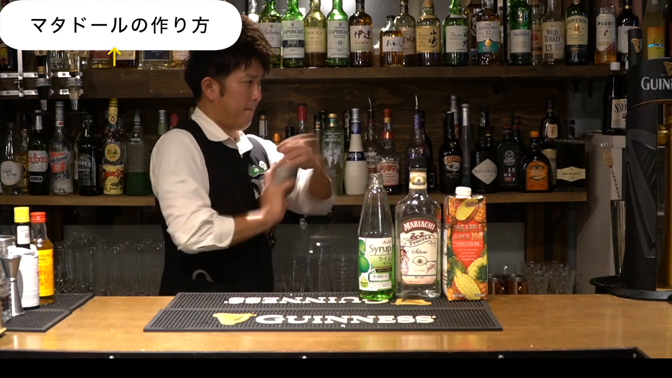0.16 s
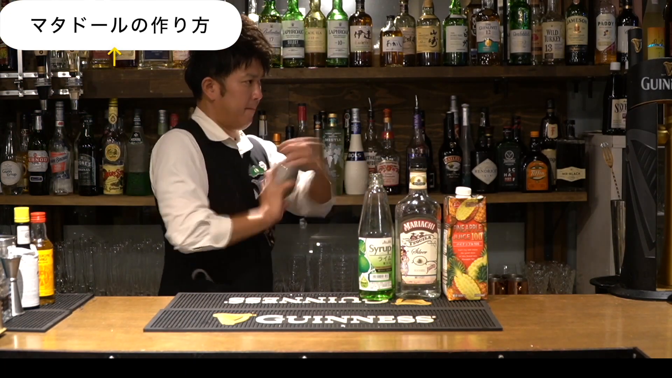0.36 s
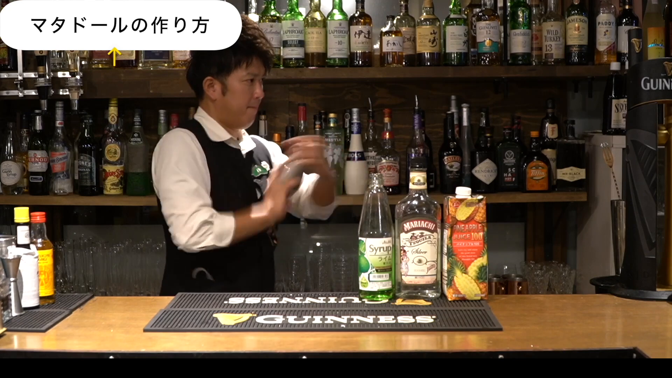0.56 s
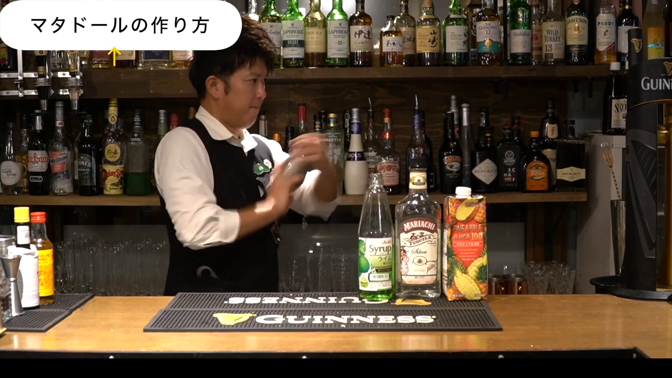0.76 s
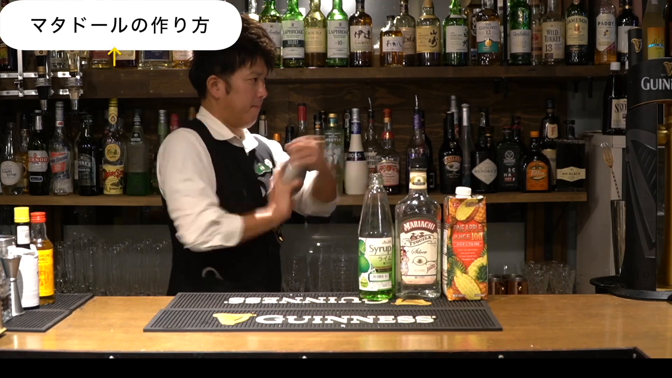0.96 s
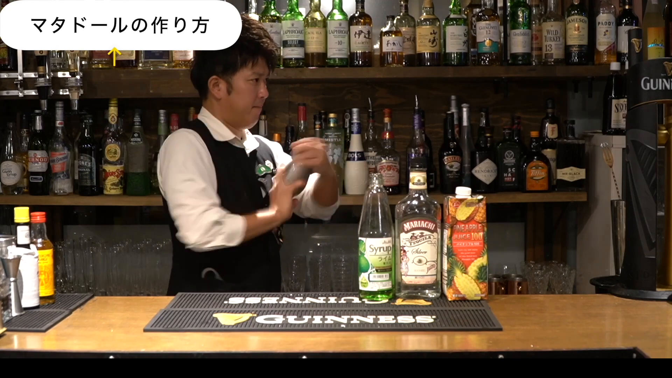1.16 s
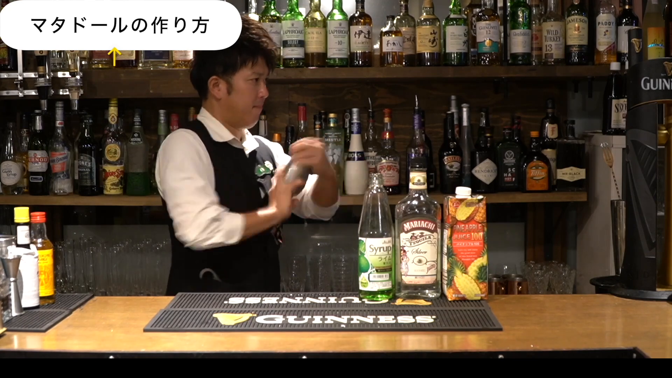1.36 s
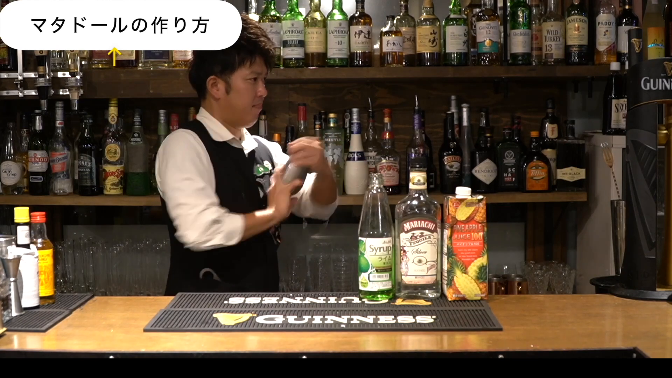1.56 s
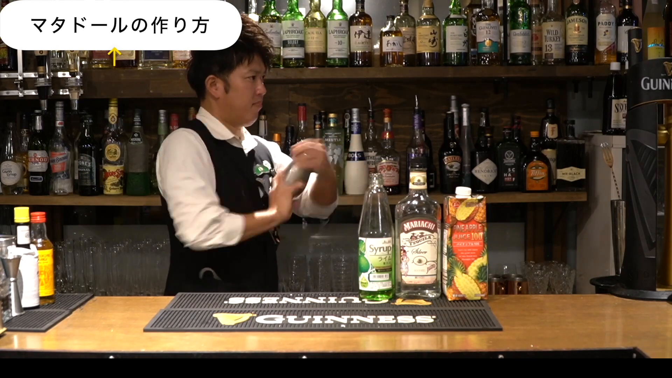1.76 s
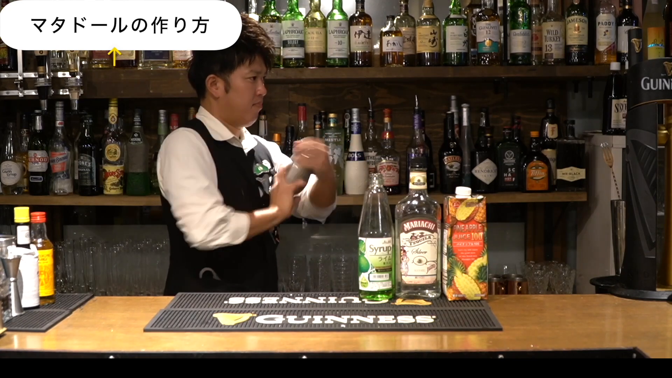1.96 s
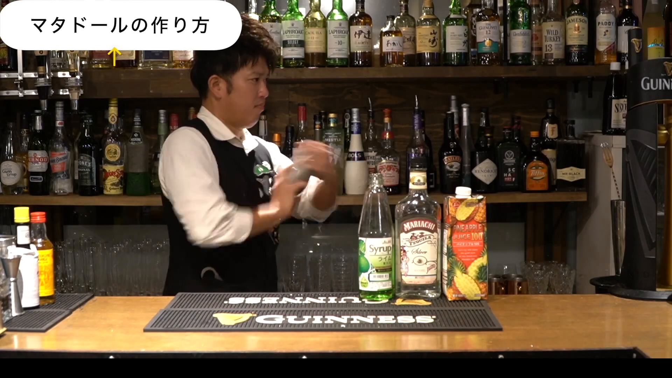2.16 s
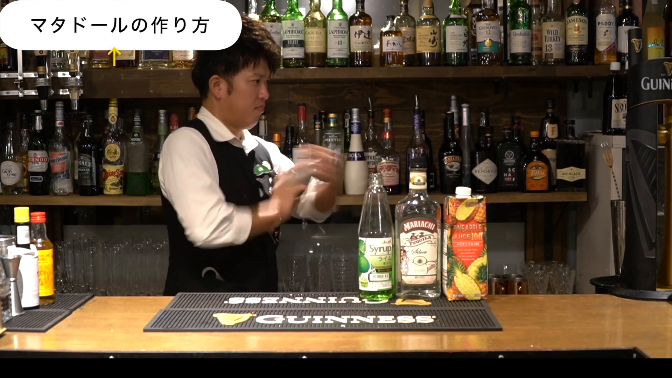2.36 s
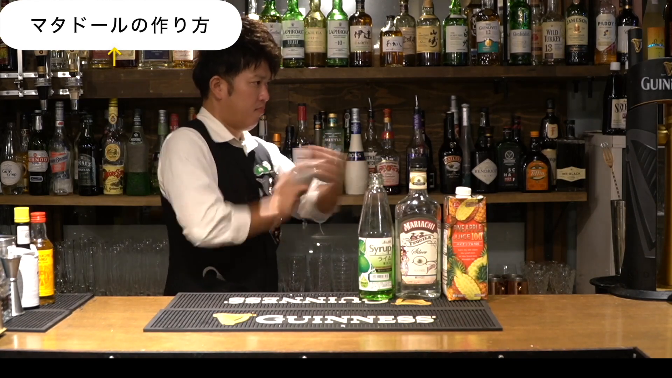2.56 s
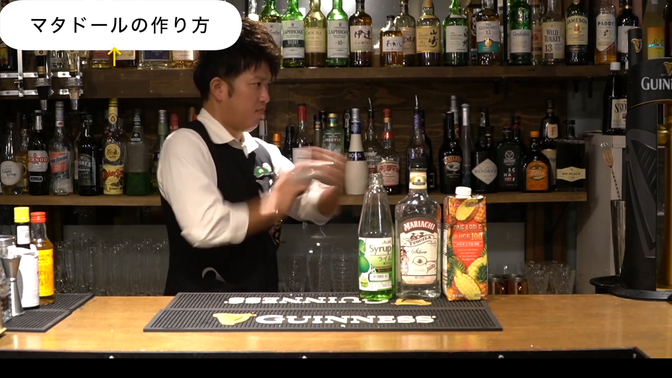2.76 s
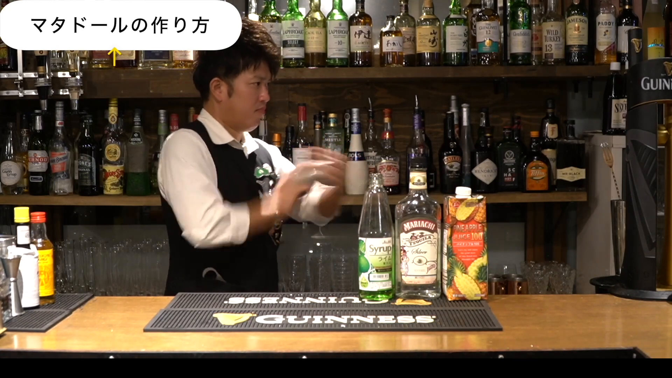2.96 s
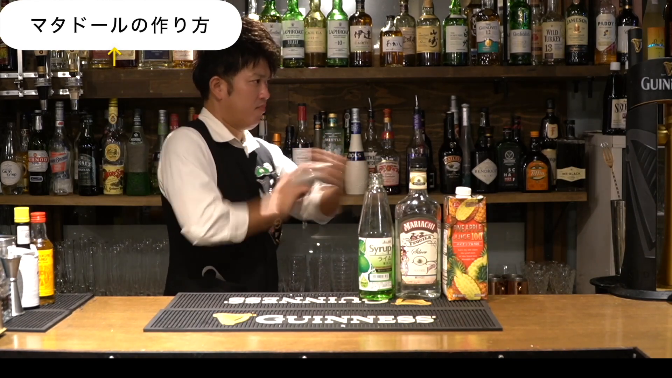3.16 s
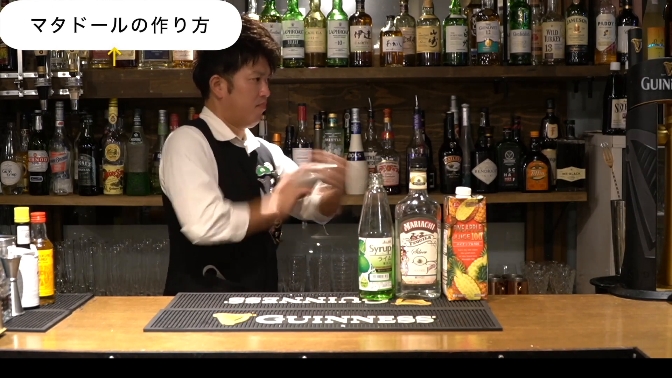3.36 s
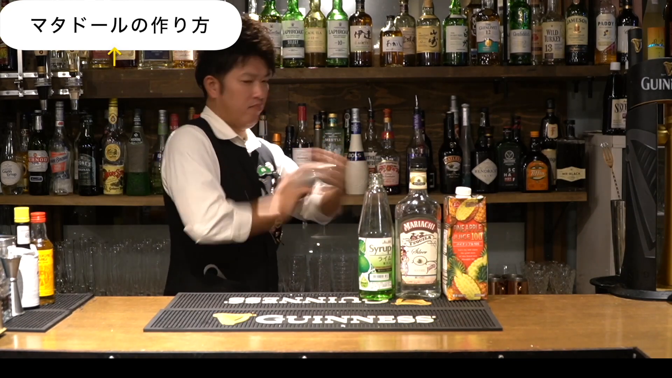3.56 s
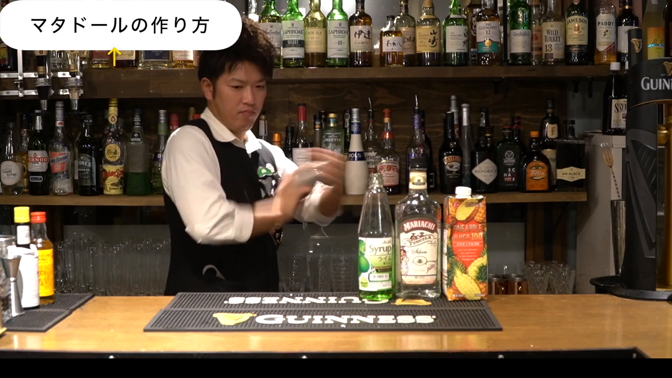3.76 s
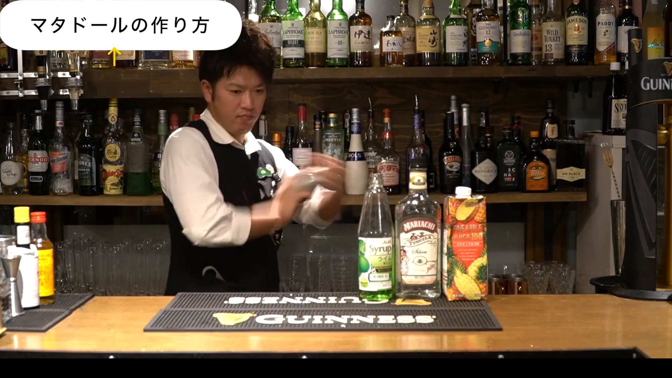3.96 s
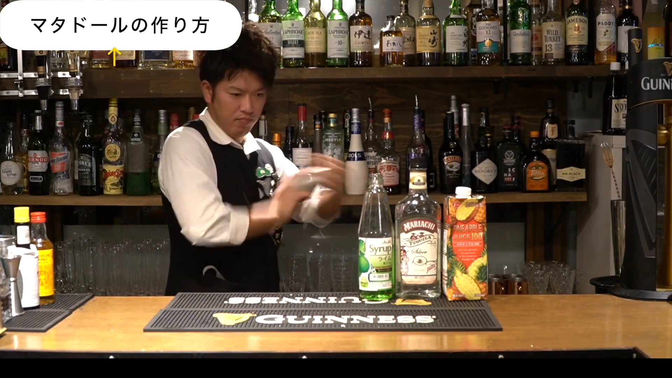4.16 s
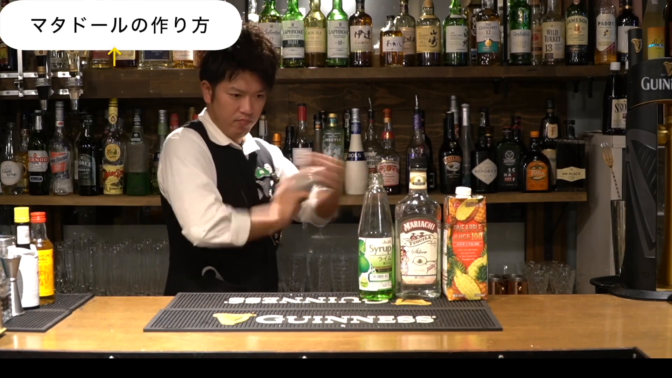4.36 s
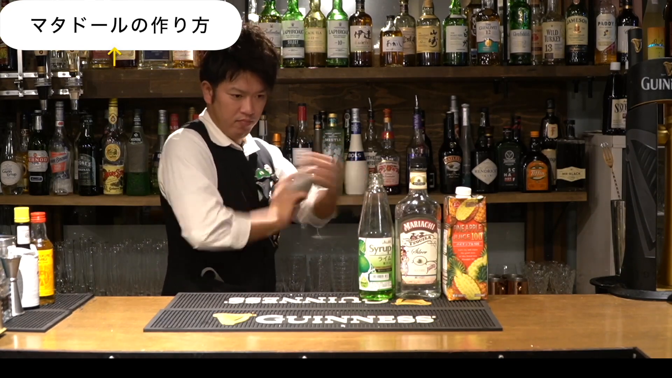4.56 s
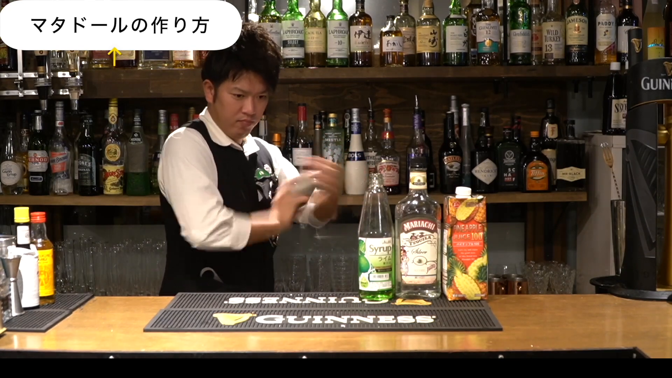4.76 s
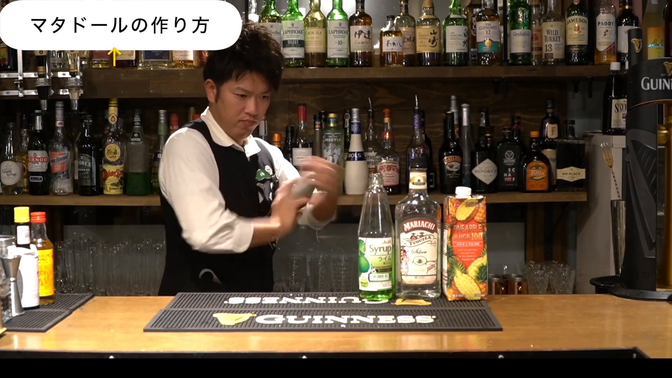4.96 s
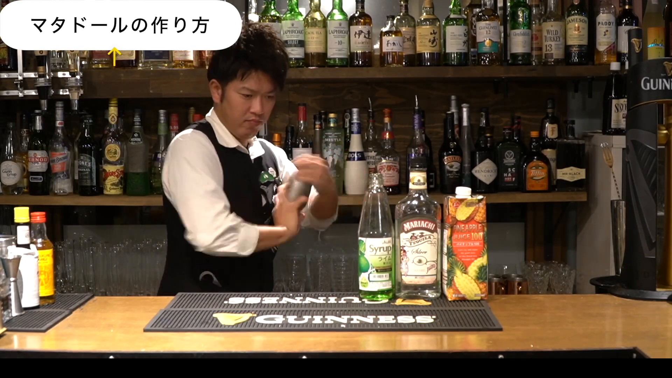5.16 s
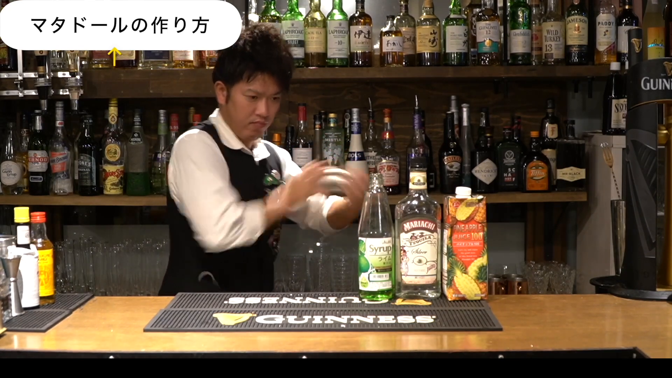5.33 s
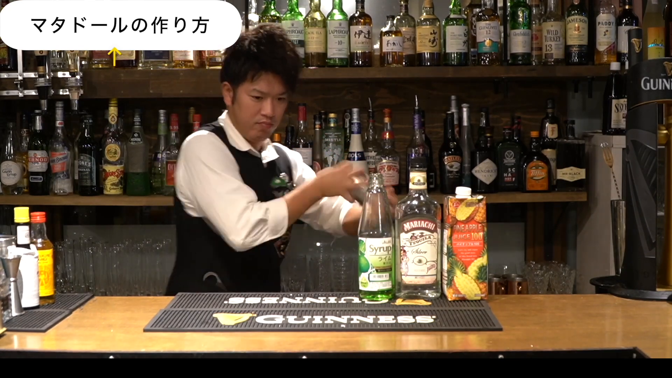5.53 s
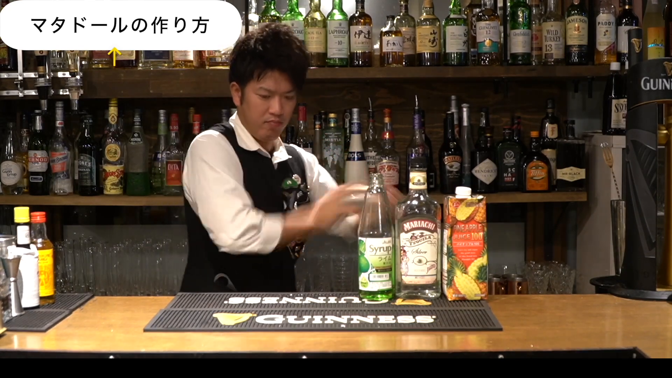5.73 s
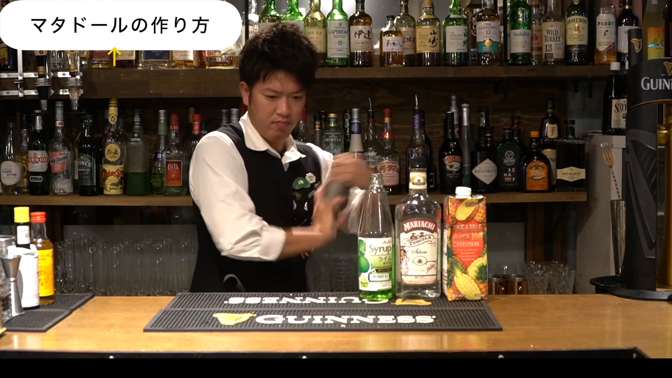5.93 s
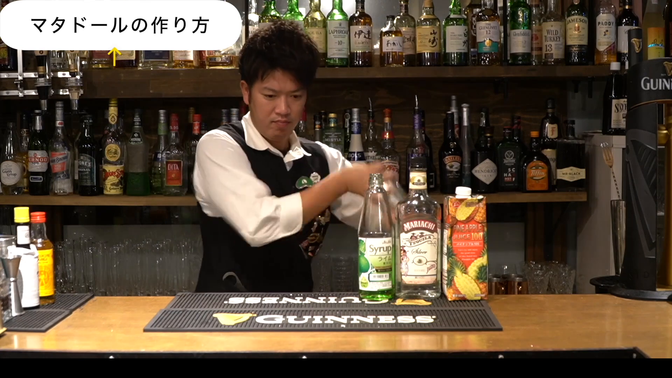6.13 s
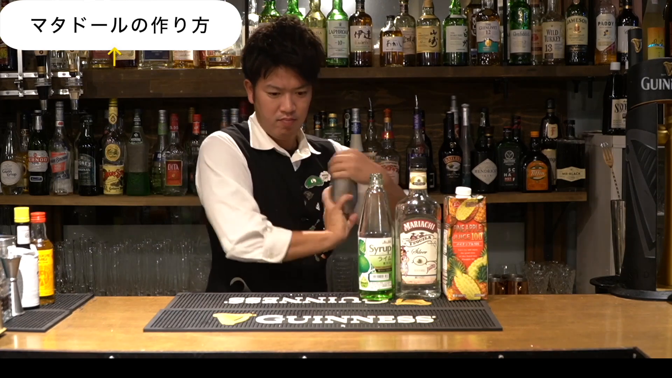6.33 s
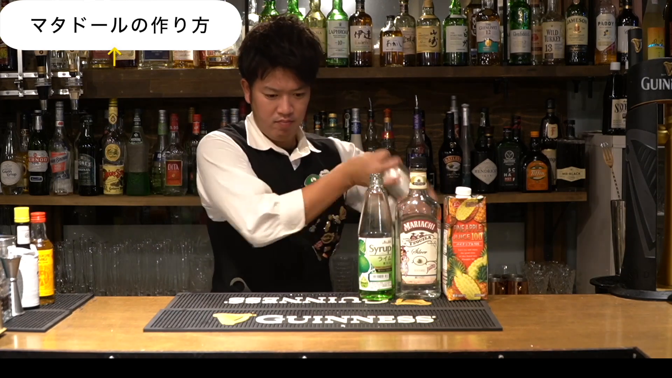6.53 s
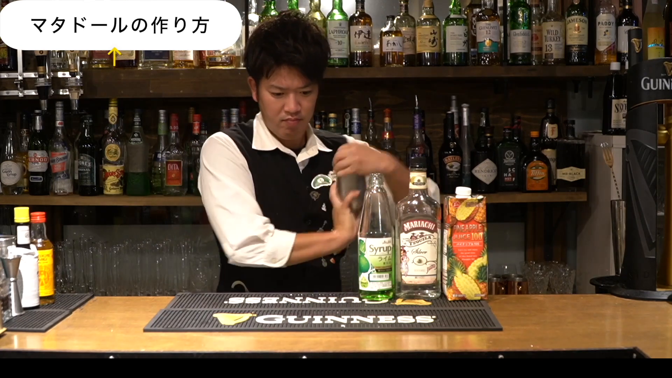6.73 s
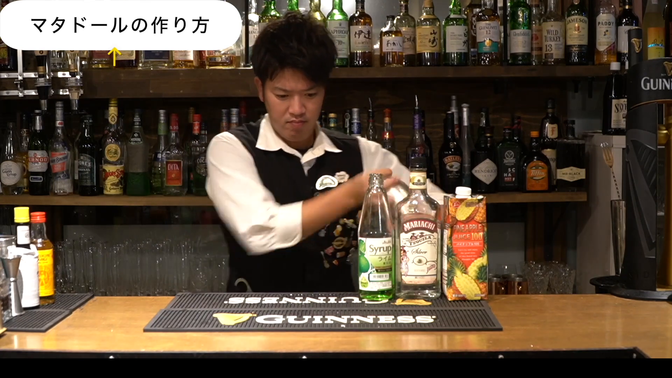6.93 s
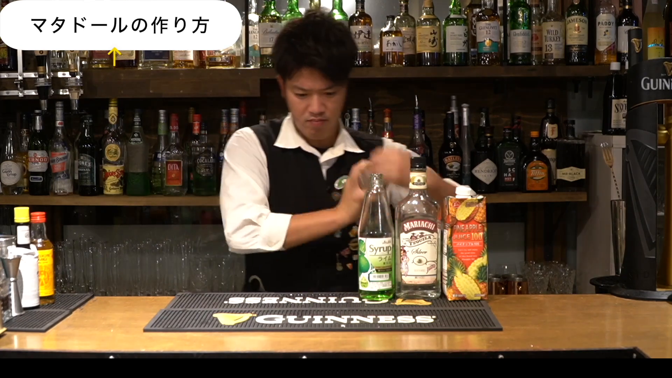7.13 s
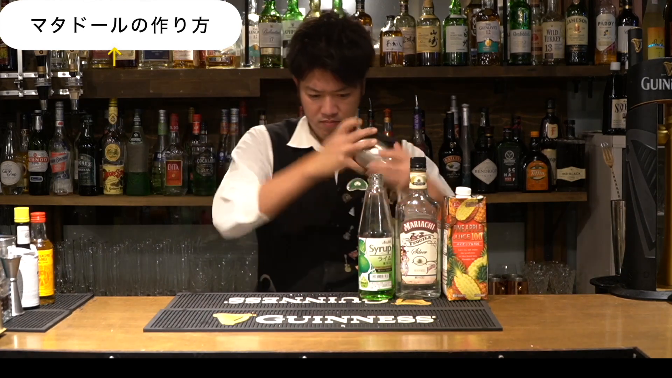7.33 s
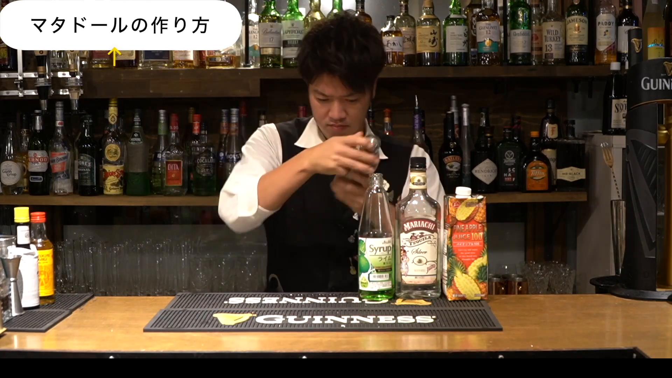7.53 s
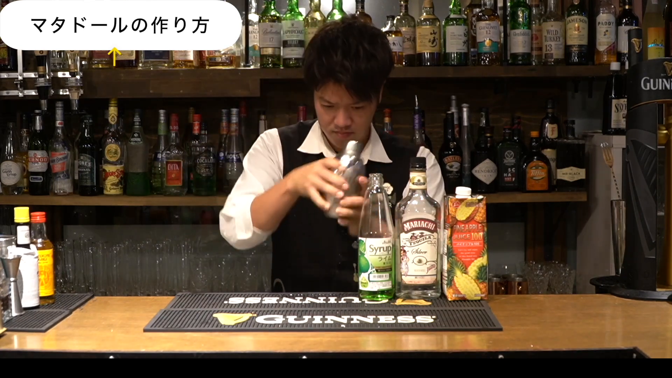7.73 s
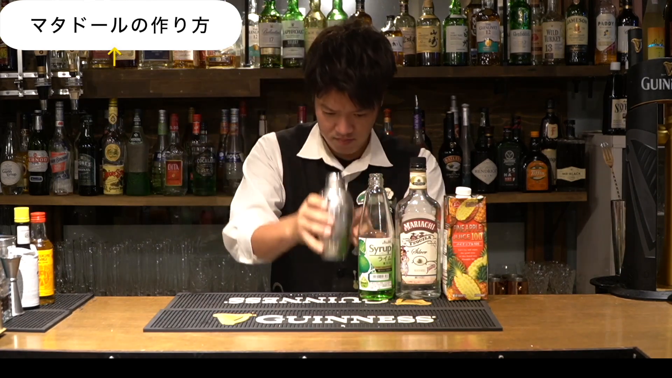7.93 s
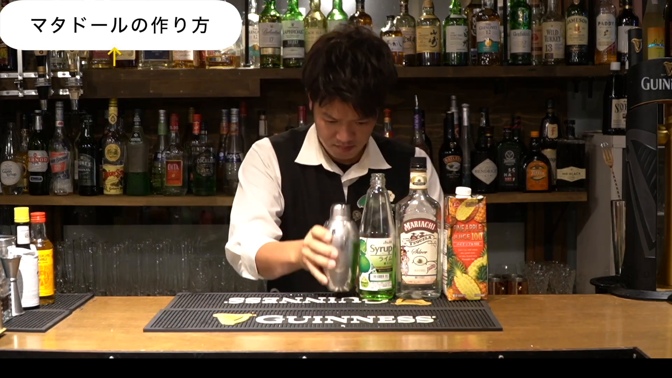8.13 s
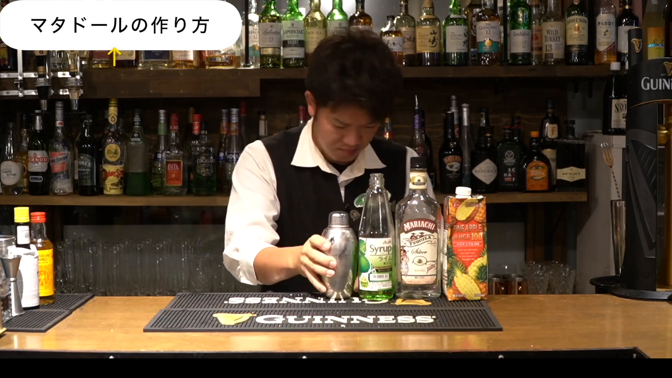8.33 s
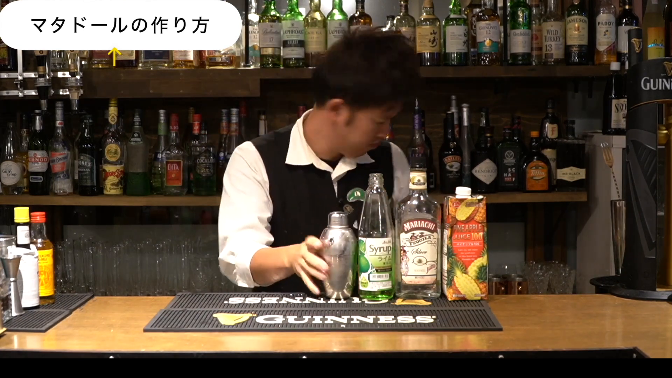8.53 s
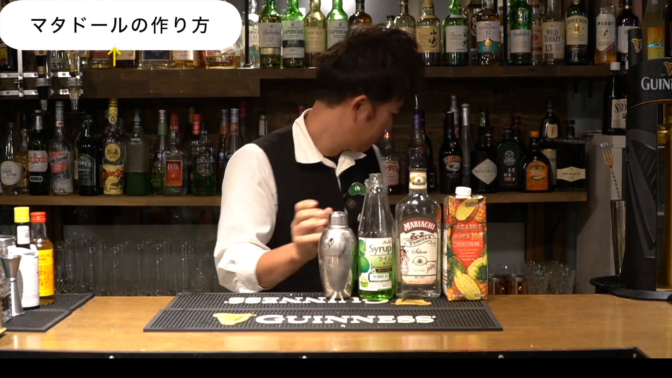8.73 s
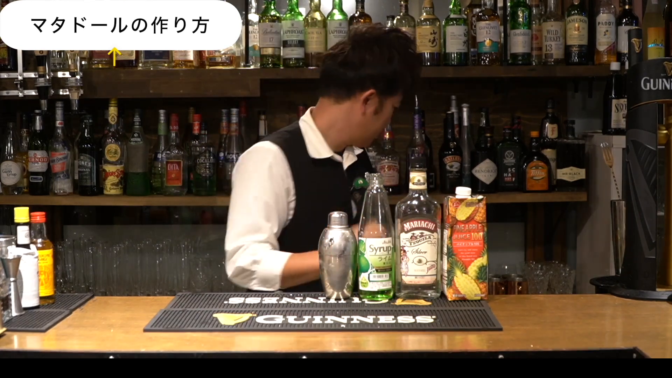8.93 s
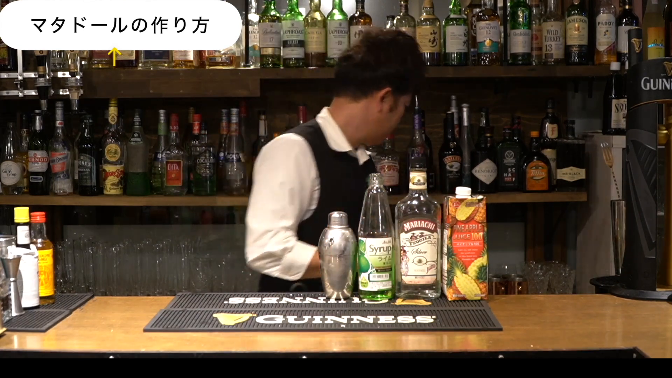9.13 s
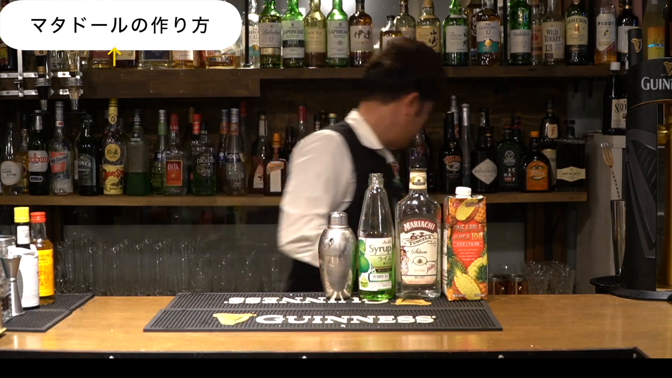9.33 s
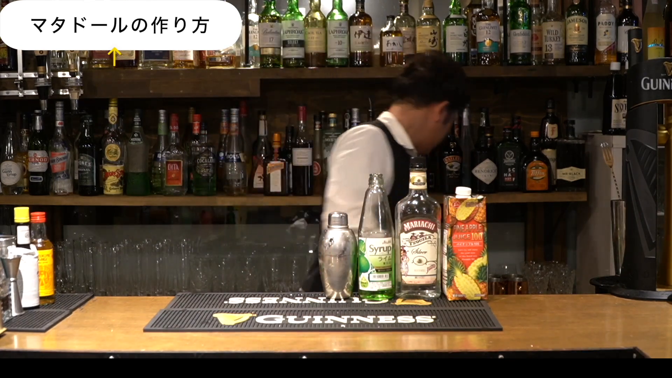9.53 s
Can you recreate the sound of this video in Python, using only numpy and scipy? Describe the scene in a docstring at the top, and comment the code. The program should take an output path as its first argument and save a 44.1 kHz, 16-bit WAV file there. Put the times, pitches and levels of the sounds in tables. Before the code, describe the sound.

From the first instant, ice is shaken hard in a steel shaker close to the microphone: about five full strokes a second, giving ten clattering hits, alternately tighter at the cap and looser, heavier at the base. Each hit mixes dull thuds, a short metallic clack around 3 kHz and brittle cracks, with gritty chips and sloshing drink between. The level eases slightly after 3 seconds. From 5.4 the strokes slow and spread, becoming separate tumbles by 6.3 to 6.8. Stray cubes snap and settle at 6.9 to 7.4, fading into tiny clicks by 7.8. At 8.1 two quick clinks against a bottle ring briefly, a soft low knock lands at 8.2, and a fainter clink follows at 8.3. Sparse ticks and very faint, wavering high squeaks continue from 8.7 to 9.4. Short, small-room echoes, soft air noise and low cooler hum surround everything.

```python
"""In a small bar, near the microphone, ice cubes are thrown to and fro in a steel shaker, five strokes a second.
Each cube is a decaying thud, a cap clack with noisy afterglow and a crack; chips and slosh are clicks and noise.
The shaking slows, the cubes settle, the shaker clinks on a bottle and rings freely as it is stood on the counter.
Bright snaps of the last cubes, then small ticks, rubs and squeaks; echoes, air noise and cooler hum surround it."""
import sys
import numpy as np
from scipy import signal
from scipy.fft import rfft, irfft, next_fast_len
from scipy.io import wavfile

SR = 44100
rng = np.random.default_rng(int(sys.argv[2]) if len(sys.argv) > 2 else 0)


def to_wav(s):
    """Save 16-bit WAV."""
    ch = np.atleast_2d(s).T  # columns
    pcm = np.round(np.clip(ch, -1, 1) * 32767)  # PCM
    wavfile.write(sys.argv[1], SR, pcm.astype(np.int16))


N = 422904

# the shaker turns round and the ice piles into one end, cap and base in turn: t/s, level/dB of a strewn cube
TURN_TIMES = [(0.076, -22), (0.185, -10.5), (0.266, -18.5), (0.38, -15.5), (0.478, -14), (0.588, -10),
              (0.677, -18.5), (0.787, -16.5), (0.874, -18), (0.987, -11.5), (1.059, -28), (1.171, -17),
              (1.27, -18), (1.376, -15.5), (1.456, -13.5), (1.57, -16.5), (1.668, -21), (1.771, -12.5),
              (1.859, -15.5), (1.969, -14), (2.05, -20.5), (2.164, -13.5), (2.245, -20), (2.343, -7.5),
              (2.438, -23), (2.539, -11), (2.633, -23), (2.74, -18.5), (2.829, -21), (2.944, -12.5),
              (3.029, -30), (3.131, -14), (3.23, -23), (3.341, -21), (3.435, -20.5), (3.539, -22),
              (3.621, -29), (3.74, -19), (3.835, -24), (3.944, -16), (4.03, -38), (4.135, -14),
              (4.228, -27), (4.354, -15.5), (4.429, -23.5), (4.555, -15), (4.645, -25.5), (4.754, -25),
              (4.841, -21), (4.962, -17), (5.049, -19), (5.175, -11), (5.276, -25), (5.387, -19),
              (5.539, -41), (5.667, -15.5), (5.799, -25), (5.969, -15), (6.13, -53), (6.324, -16),
              (6.505, -27.5), (6.757, -19)]
# the released shaker clinks against a bottle: t/s, shaker level/dB, bottle level/dB
CLINK_TIMES = [(8.104, -25, -34), (8.1234, -23, -22.5), (8.306, -33, -64)]


def from_db(db):
    """Decibels to an amplitude factor."""
    return 10 ** (np.asarray(db) / 20)


def rms_one(x):
    """Scales a signal to an RMS of one."""
    return x / np.sqrt(np.mean(x ** 2) + 1e-20)


def in_time(rows):
    """Draws each column of a table as a curve over the whole scene; the first column is time in s."""
    s, *columns = np.transpose(rows)
    return [np.interp(np.arange(N) / SR, s, c) for c in columns]


def band(x, low_hz, high_hz):
    """Band-pass, its upper edge held below 0.45 of the sample rate."""
    return signal.sosfilt(signal.butter(2, [low_hz, min(high_hz, .45 * SR)], "band", fs=SR, output="sos"), x)


def colour(x, spectrum):
    """Shapes a flat signal by an f/Hz, level/dB table, straight over log frequency."""
    size = next_fast_len(N)
    hz = np.maximum(np.arange(size // 2 + 1) * SR / size, 1)
    point_hz, point_db = np.array(spectrum).T
    gain = from_db(np.interp(np.log(hz), np.log(point_hz), point_db))
    return irfft(rfft(x, size) * gain, size)[:N]


def ring(clicks, hz, t60):
    """A resonator: a unit click sets a sine of height 1 ringing, 60 dB down after t60 seconds."""
    r, w = from_db(-60 / (t60 * SR)), 2 * np.pi * hz / SR
    return signal.lfilter([0, np.sin(w)], [1, -2 * r * np.cos(w), r * r], clicks + 1e-18)


def add(out, s, grain):
    """Lays a short sound into out at s seconds."""
    i = round(s * SR)
    out[i:i + len(grain)] += grain[:N - i]


def cubes():
    """Cubes that stand out singly, and two more strewn around every turn; the narrow cap gathers them in time."""
    # cubes that stand out singly, down to the faint last ones:
    # t/s, thud level/dB, cap ring f/Hz, ring level/dB, crack level/dB
    single_cubes = [(0.0596, -10, 3670, -11.5, -7), (0.146, -29, 2870, -33, -29.0),
                    (0.172, -5.5, 3570, -19, -10), (0.2581, -14, 3040, -31, -11.5),
                    (0.3736, 0.5, 2780, -13, -15), (0.3798, -9.5, 3270, -23, -9.5),
                    (0.4618, -9.5, 3650, -5, -1), (0.568, -13, 3530, -23.0, -29),
                    (0.5802, -32, 3470, -19, -9), (0.5897, -5, 3350, -25, -10),
                    (0.5956, -10.5, 2940, -15, -24), (0.624, -37.5, 2800, -43.5, -13.5),
                    (0.6766, -15, 3560, -33, -9.5), (0.77, -12.5, 3300, -34, -14),
                    (0.778, -9.5, 3520, -30, -8), (0.8583, -18.5, 3560, -26.5, -9.5),
                    (0.9672, -10, 3160, -27, -14.5), (0.9743, -25.5, 3640, -20, -26),
                    (0.9826, -5.5, 2760, -24, -7.5), (1.0084, -32.5, 3270, -37, -13.5),
                    (1.0515, -12, 2520, -15, -12), (1.062, -23, 3150, -24.5, -10),
                    (1.148, -15, 2300, -38, -12), (1.1697, -7.5, 3200, -20.5, -6.5),
                    (1.1863, -12.5, 4400, -33.5, -12.5), (1.2514, -16, 3020, -23.5, -4.5),
                    (1.31, -21, 3970, -31, -17.5), (1.3626, -11, 3630, -22.5, -11),
                    (1.377, -11.5, 3600, -11, -16.5), (1.437, -23, 3700, -30, -24),
                    (1.4515, -14, 3660, -6.5, -2), (1.5318, -25, 2980, -23, -29),
                    (1.5571, -9, 3550, -21.5, -23.5), (1.5728, -9, 3640, -15, -8),
                    (1.601, -34, 4320, -26, -27), (1.626, -38, 4000, -37, -22.5),
                    (1.652, -22, 3350, -8.5, -1.5), (1.659, -11.5, 3110, -6.5, -16),
                    (1.7519, -15, 3160, -17, -17), (1.759, -23.5, 3660, -20.5, -5.5),
                    (1.7686, -10.5, 3800, -22, -20.5), (1.79, -18, 2830, -22, -24.5),
                    (1.85, -18.5, 3670, -24.5, -4.5), (1.9617, -11, 3730, -17.0, -21),
                    (1.9725, -14, 3720, -16, -15), (2.0432, -13, 3220, -16.5, -10.5),
                    (2.1561, -5.5, 3020, -13, -5.5), (2.2279, -11.5, 2850, -1.5, -2),
                    (2.3362, -13, 3260, -21.0, -14), (2.3452, -10.5, 3600, -24.5, -14),
                    (2.423, -12, 3240, -9, -7.5), (2.512, -35, 3680, -20, -25),
                    (2.52, -16.5, 3600, -18, -28), (2.542, -9.5, 4180, -24, -24.0),
                    (2.626, -17.5, 3920, -38, -25), (2.6526, -38, 3670, -26, -35),
                    (2.7251, -3, 3480, -17.0, -5.0), (2.734, -11, 2850, -12.0, -27),
                    (2.8197, -11, 3210, -9.5, -14.5), (2.89, -21, 2700, -23, -19),
                    (2.9266, -9.5, 3680, -23, -13.5), (2.9448, -6.5, 3380, -19.5, -11),
                    (3.013, -24.5, 3300, -37.5, -19), (3.0236, -12, 3300, -27, -14.5),
                    (3.09, -22.0, 3960, -23, -24.0), (3.1128, -11, 4000, -17.5, -6.5),
                    (3.131, -16.5, 3050, -27.5, -16), (3.1451, -10, 4300, -12, -25.5),
                    (3.222, -11, 3510, -13.5, -11), (3.288, -22, 3340, -23.5, -28),
                    (3.301, -22.0, 2380, -23, -17.0), (3.314, -20.0, 3540, -25, -18.0),
                    (3.3243, -15, 3500, -14, -15), (3.3359, -13.5, 3630, -11, -18.5),
                    (3.3456, -6, 3800, -23, -10.5), (3.352, -37, 3600, -21, -25.5),
                    (3.4199, -12.5, 3150, -11, -14.5), (3.4528, -21.0, 3530, -30, -25),
                    (3.4821, -28, 2960, -23.0, -17.0), (3.5123, -11.5, 3850, -17, -11),
                    (3.5254, -12, 3600, -24, -13.0), (3.532, -13, 3140, -6, -14),
                    (3.5473, -9, 3720, -20, -15), (3.5543, -21, 3280, -24, -19),
                    (3.6247, -13.5, 2520, -14, -9.5), (3.7045, -19, 3100, -18, -23),
                    (3.7509, -6, 3480, -11, -25), (3.7583, -24, 3200, -18, -14),
                    (3.834, -14, 3190, -32, -33), (3.8871, -23, 3580, -17, -15.5),
                    (3.9232, -8.5, 3880, -18.5, -10), (3.9518, -9.5, 3600, -28, -22),
                    (4.019, -15, 2790, -15, -13.5), (4.0882, -21, 2920, -13.5, -16),
                    (4.115, -27, 3080, -12, -36), (4.127, -49, 3700, -12, -22),
                    (4.1434, -4, 2780, -10.5, -11), (4.217, -15, 2610, -9.5, -11),
                    (4.3124, -13.5, 2980, -15.5, -14.5), (4.336, -7.5, 3250, -10, -12),
                    (4.3437, -17.5, 3050, -23.5, -11), (4.432, -19, 3350, -18.5, -27.5),
                    (4.5402, -7, 4000, -15.5, -21), (4.5521, -13.0, 3000, -14.5, -18),
                    (4.564, -14, 2720, -22, -11), (4.6416, -19, 3720, -31, -15),
                    (4.7099, -29, 3770, -23, -29), (4.7342, -17, 3900, -34, -7.0),
                    (4.7569, -11, 2820, -12, -21.5), (4.766, -22, 3050, -17.5, -30),
                    (4.8324, -31, 2800, -31, -26), (4.9432, -24.5, 3250, -11.5, -23),
                    (4.951, -21, 3320, -16, -23), (4.9616, -4.5, 2900, -12.5, -12.5),
                    (4.9722, -20.5, 3300, -18.0, -13.5), (5.0465, -29.5, 3740, -13, -41),
                    (5.1227, -17, 2620, -19, -21), (5.168, -9, 3200, -17, -9),
                    (5.1801, -10, 3300, -8.5, -20), (5.275, -30, 3200, -23, -40),
                    (5.3676, -16.5, 3300, -53, -9.5), (5.383, -15.5, 3280, -22, -33.5),
                    (5.401, -17, 3450, -22, -12), (5.4195, -8, 2900, -17.5, -8),
                    (5.5217, -26, 2740, -12, -11), (5.5325, -17.5, 3400, -24.5, -34.5),
                    (5.6477, -14.5, 3550, -19, -30), (5.6753, -16, 3950, -12.5, -19.5),
                    (5.78, -13.5, 2720, -4.5, -6), (5.8807, -35, 2620, -18, -45),
                    (5.9494, -11.5, 2960, -16, -18), (5.9646, -17.5, 3030, -14.0, -21),
                    (5.9826, -15, 3760, -16, -14), (6.1036, -32.0, 2780, -21, -29),
                    (6.111, -36, 2360, -22, -17), (6.1482, -25, 2560, -19.5, -12),
                    (6.219, -45, 2530, -25, -42), (6.2693, -28, 3900, -17.5, -22),
                    (6.3086, -10.5, 3370, -10, -12.5), (6.3214, -8.5, 2740, -17.5, -29),
                    (6.358, -25, 3750, -27, -24), (6.3934, -23, 3600, -22, -21),
                    (6.476, -43, 3000, -37, -37), (6.4971, -29.0, 2700, -15, -21),
                    (6.5795, -27.5, 3520, -30.5, -38), (6.683, -29, 3000, -41, -36),
                    (6.7126, -21, 3260, -21.5, -25), (6.742, -18.5, 3830, -20, -25),
                    (6.7505, -20.5, 3650, -16, -26), (6.7582, -20, 2710, -15, -19.5),
                    (6.7687, -17.5, 3870, -21, -18), (6.8606, -39, 3800, -31, -36),
                    (6.9293, -18, 2700, -13, -15), (6.933, -33, 2500, -13.5, -31),
                    (6.98, -21, 3280, -22, -19), (7.1603, -25, 3990, -44, -19),
                    (7.179, -34, 4490, -34.0, -36), (7.1949, -21.5, 4490, -44, -38),
                    (7.21, -45, 4600, -34, -21.5), (7.314, -39, 3050, -56, -46.5),
                    (7.3574, -48, 3770, -50, -36), (7.369, -32, 2060, -24, -40),
                    (7.3734, -16.5, 2830, -13, -22), (7.3897, -18.0, 2150, -15, -20.5),
                    (7.3994, -39, 3700, -25, -18), (7.4625, -34.5, 2670, -38, -37),
                    (7.4905, -35.0, 2200, -31, -30), (7.5127, -33, 3780, -37, -33),
                    (7.695, -33, 3820, -52, -60), (7.7027, -46, 3670, -39, -35),
                    (7.7762, -34, 3520, -37, -45)]
    per_turn = 2
    cap_spread_s, base_spread_s = 0.0071, .016
    ring_db, crack_db, uneven_db = -3.5, -2, 5.0    # ring and crack against the thud; scatter of all three
    cap_low_hz, cap_high_hz = 2593, 4150
    s, db = np.repeat(TURN_TIMES, per_turn, axis=0).T
    spread_s = np.repeat(np.resize([cap_spread_s, base_spread_s], len(TURN_TIMES)), per_turn)
    when = np.clip(rng.standard_normal(len(s)), -1.6, 2)
    thud, clack, crack = uneven_db * np.clip(rng.standard_normal((len(s), 3)), -2, 1).T
    hz = cap_low_hz + (cap_high_hz - cap_low_hz) * rng.random(len(s))
    strewn = [s + spread_s * when, db + thud, hz, db + ring_db + clack, db + crack_db + crack]
    return np.vstack([single_cubes, np.transpose(strewn)])


def blows(ice, edge_db=-10.0, linger_db=-20.0, free_hz=2900.0, grip_db_per_khz=9.0):
    """Each cube gives a dull thud of the wall, a clack of the cap with a rough afterglow, and a brittle crack."""
    grip_s, grip_db = 7.1, -16      # both hands close round the shaker and still its afterglow
    out, t = np.zeros(N), np.arange(8000) / SR
    luck, noise = rng.random((len(ice), 3)), rng.standard_normal((len(ice), len(t)))
    cracks = band(noise[:, :600] * from_db(-60 * t[:600] / 0.0021), 10300, 15700)
    edges = band(noise[:, -600:] * from_db(-60 * t[:600] / 0.006), 4500, 7000)
    for (s, thud_db, hz, ring_db, crack_db), chance, crack, edge, hiss in zip(ice, luck, cracks, edges, noise):
        wall_hz = 500 * 4.72 ** chance[0]
        wall = np.sin(2 * np.pi * (wall_hz * t + chance[1])) * from_db(-60 * t / 0.0051)
        # two neighbouring modes make the clack broad
        second_hz = hz * (0.66 + 0.65 * chance[2])
        cap = np.sin(2 * np.pi * hz * t) + from_db(-5.5) * np.sin(2 * np.pi * second_hz * t)
        cap *= from_db(-60 * t / 0.0096)
        # a crowd of close modes dies as narrow noise
        crowd = rms_one(band(band(hiss, hz / 1.11, hz * 1.11), hz / 1.11, hz * 1.11))
        crowd *= from_db(-60 * t / 0.28) * np.minimum(t / 0.0014, 1)
        # fingers damp the high modes, a heavy thud of drink damps all
        finger_db = grip_db_per_khz * max(hz - free_hz, 0) / 1000
        drink_db = 0.33 * max(thud_db + 21.5 - ring_db, 0)
        cap += from_db(linger_db + grip_db * (s > grip_s) - finger_db - drink_db) * crowd
        thud_and_clack = from_db(thud_db) * wall + from_db(ring_db) * cap
        add(out, s, thud_and_clack * np.minimum(t / 0.00033, 1))
        add(out, s, from_db(crack_db) * crack / np.abs(crack).max())
        add(out, s, from_db((crack_db + ring_db) / 2 + edge_db) * edge / np.abs(edge).max())
    return band(out, 160.0, 19000)      # the blows keep nothing below 160 Hz


def ice_grit(per_s=1000.0):
    """Small pieces of uneven size click at random; each stirs all pitches by strengths of its own."""
    # colour of the chips: f/Hz, relative level/dB per Hz
    chip_colour = [(71, -52.5), (120, -15.5), (205, -15.5), (624, -1.5), (1540, 3), (2280, 5), (2810, 6),
                   (3740, 9.5), (4790, 2.5), (8020, -4.5), (14000, 2.5), (15500, -1.5), (16500, -29.5)]
    sizes = from_db(4.5 * np.minimum(rng.exponential(1, N), 3)) * rng.choice([-1, 1], N)
    sizes *= rng.random(N) < per_s / SR
    clicks = np.zeros(N)
    for hz in np.geomspace(250, 15000, 12):
        strengths = from_db(8.0 * np.clip(rng.standard_normal(N), -3, 1.5))
        clicks += ring(sizes * strengths, hz, 4 / hz) * np.sqrt(hz)     # each dies within four cycles
    return rms_one(colour(rms_one(clicks) + from_db(-12.0) * rng.standard_normal(N), chip_colour))


def slosh_power():
    """Power of the slosh: it comes in spurts and thins while the load flies to the other end."""
    # chips and drink sloshing along the wall: t/s, level/dB before spurts and flight
    slosh_levels = [(0, -38), (1, -40), (2, -39), (3, -41.5), (4, -38), (5, -40.5), (5.7, -39.5),
                    (6.2, -43.5), (6.7, -47.5), (7.1, -48.5), (7.5, -58.5), (7.8, -62), (8.05, -81)]
    flight_db_per_s, flight_s, turn_lead_s = -70.0, .1, .017
    t = np.arange(N) / SR
    lumps = rms_one(band(rng.standard_normal(N), 1.9, 25))
    starts = np.append(-1, np.array(TURN_TIMES)[:, 0] - turn_lead_s)
    since_turn = t - starts[np.searchsorted(starts, t) - 1]
    flight = np.minimum(since_turn, flight_s) - flight_s / 2
    db = in_time(slosh_levels)[0] + flight_db_per_s * flight + 4.0 * lumps
    return from_db(2 * db) * (np.arange(N) < slosh_levels[-1][0] * SR)


def chips(ice, lead_db=-3.0, lead_s=0.0049):
    """Small pieces swarm after every blow, and ahead of it at the base, over the slosh of the drink."""
    # chips behind thud, ring and crack: from f/Hz, to f/Hz (held by band), level/dB, scatter t/s
    swarms = [(19.3, 1550, -12.5, 0.007), (2220, 3630, -16, 0.0084), (5145, 39700, -17.5, 0.0073)]
    grit, slosh = ice_grit(), slosh_power()
    shocks = np.zeros((3, N))
    shocks[:, (ice[:, 0] * SR).astype(int)] = from_db(2 * ice[:, [1, 3, 4]]).T     # as power
    # only the pile-up at the base, every second turn, builds up beforehand
    turn_s = np.array(TURN_TIMES)[:, 0]
    at_base = np.round(np.interp(np.arange(N) / SR, turn_s, np.arange(len(turn_s)))) % 2
    backwards = (shocks[0] * at_base)[::-1]
    ahead = signal.lfilter([1], [1, -np.exp(-1 / (lead_s * SR))], backwards)[::-1]
    ahead = from_db(2 * lead_db) * ahead
    out = np.zeros(N)
    for shock, (low_hz, high_hz, db, scatter_s) in zip(shocks, swarms):
        behind = signal.lfilter([1], [1, -np.exp(-1 / (scatter_s * SR))], shock)
        power = from_db(2 * db) * (behind + ahead) + slosh
        out += np.sqrt(power) * band(grit, low_hz, high_hz)
    return out


def clinks():
    """Shaker and bottle ring freely, each mode split in four by uneven walls."""
    # modes of the steel shaker: f/Hz, relative level/dB, t60/s
    shaker_modes = [(1585, -1.5, 0.44), (2441, -12, 0.51), (3980, -1.5, 0.22), (4240, 0, 0.16),
                    (5900, -11, 0.3), (8150, -5, 0.12), (8823, 2.5, 0.14), (9130, -12.5, .14),
                    (11100, -8, .08), (12700, -3, 0.077), (15070, -22, .09)]
    # modes of the bottle: f/Hz, relative level/dB, t60/s
    bottle_modes = [(1570, -8, 0.4), (2010, -8, 0.38), (3370, -0.5, 0.42), (3790, 7, 0.27), (4000, 6, 0.12),
                    (4670, -8, 0.25), (5460, -17, 0.31), (7700, -3, 0.23), (8480, -1, 0.19),
                    (10270, -13, 0.2), (12400, 3, 0.14), (13570, -8, 0.12)]
    out, at = np.zeros(N), [round(row[0] * SR) for row in CLINK_TIMES]
    start = min(at)
    for column, modes in enumerate([shaker_modes, bottle_modes], 1):
        clink_db = np.array(CLINK_TIMES)[:, column]
        for hz, db, t60 in modes:
            for split, split_db in ((-.011, -19.5), (0, 3), (.016, -9), (.037, -10)):
                clicks = np.zeros(N)
                scatter_db = rng.normal(0, 2, len(at))
                clicks[at] = from_db(clink_db + db + split_db - 20.5 + scatter_db)
                out[start:] += ring(clicks[start:], hz * (1 + split), t60)
    return out


def jangle(jangle_db=-15.5):
    """Loose cap and strainer jangle briefly at each clink: two bands of dying noise."""
    out, t = np.zeros(N), np.arange(SR // 4) / SR
    for s, shaker_db, _ in CLINK_TIMES:
        low = band(rng.standard_normal(len(t)), 1670, 5400)
        high = band(rng.standard_normal(len(t)), 8800, 16500)
        add(out, s, from_db(shaker_db + jangle_db - 60 * t / 0.2) * (low + high))
    return out


def counter_knock():
    """The base lands on the mat and the counter answers with a low knock of a few damped modes."""
    # the base lands on the mat of the counter: t/s, level/dB
    landings = [(8.2106, -36)]
    # modes of the counter: f/Hz, relative level/dB, t60/s
    counter_modes = [(118, -0.5, 0.27), (196, -6.5, 0.13), (285, 5.5, 0.055), (455, 9.5, 0.014)]
    knock, out = np.zeros(N), np.zeros(N)
    for s, db in landings:
        add(knock, s, -from_db(db) * np.hanning(40) / 20)       # the mat softens the contact
    for k, (hz, db, t60) in enumerate(counter_modes):
        out += from_db(db) * ring(knock, hz, t60) * (-1) ** k
    return out


def bright_snaps():
    """Brief bright snaps of dying noise, each around a pitch of its own."""
    # bright snaps of the last ice cubes, then small ticks and rubs of handling:
    # t/s, peak level/dB, f/Hz, width/octaves, t60/s
    snap_rows = [(6.9272, -16.5, 5760, 0.4, 0.012), (7.0543, -35, 7500, .8, 0.0072),
                 (7.1601, -18, 4570, 0.42, 0.0052), (7.1791, -34, 4950, 0.27, 0.011),
                 (7.186, -49, 4900, 0.25, .012), (7.194, -34, 4950, 0.27, 0.01),
                 (7.21, -27, 4700, 0.26, .008), (7.608, -47, 7650, 0.48, .008),
                 (7.6254, -46, 2200, 0.84, .008), (7.751, -45, 3000, .9, .008),
                 (7.8306, -52, 4110, 0.36, .06), (7.853, -53, 3870, 0.27, .04),
                 (7.8999, -57, 3800, 0.28, .01), (8.215, -42, 2500, 0.77, .02), (8.377, -56, 3700, .3, .01),
                 (8.43, -56, 3200, 0.43, .01), (8.4607, -52, 9000, .6, .008), (8.725, -60, 6200, .6, .008),
                 (9.19, -42, 5500, 1.6, .006)]
    out, t = np.zeros(N), np.arange(3000) / SR
    for s, db, hz, octaves, t60 in snap_rows:
        reach = 2 ** (octaves / 2)
        snap = band(rng.standard_normal(len(t)) * from_db(-60 * t / t60), hz / reach, hz * reach)
        add(out, s, from_db(db) * snap / np.abs(snap).max())
    return out


def squeaks():
    """Thin wavering squeaks: a near sine that flutters and fades in and out."""
    # one list of rows a squeak: t/s, f/Hz, level/dB before a common lift and flutter
    squeak_paths = [
        [(8.69, 6180, -89.5), (8.71, 6360, -84), (8.79, 6170, -82), (8.85, 5810, -79), (8.915, 5840, -79.5),
         (8.945, 6100, -80), (9.005, 5840, -77.5), (9.09, 6230, -81), (9.165, 5600, -91.5)],
        [(9.13, 4560, -95), (9.185, 4250, -81.5), (9.235, 4450, -87)],
        [(9.235, 5730, -89), (9.26, 5800, -78), (9.3, 5960, -83)],
        [(9.3, 4650, -83.5), (9.33, 4450, -86), (9.36, 4600, -80), (9.41, 4520, -88)],
        [(9.34, 5100, -86), (9.375, 5350, -82.5), (9.4, 5300, -88)],
    ]
    out, t = np.zeros(N), np.arange(N) / SR
    for rows in squeak_paths:
        hz, db = in_time(rows)
        fade = np.clip(np.minimum(t - rows[0][0], rows[-1][0] - t) / .01, 0, 1)
        flutter_db = 2.4 * rms_one(band(rng.standard_normal(N), 11, 60))
        tone = np.sin(2 * np.pi * np.cumsum(hz) / SR)
        out += fade * from_db(db + 3.5 + flutter_db) * tone
    return out


def bar_room(x, first_s=0.0013):
    """Dense echoes from shelves and walls: noise that dies octave by octave, after a short first gap."""
    # echoes by octave: centre f/Hz, t60/s, level/dB
    echo_bands = [(152, 0.15, -27), (500, 0.12, -10.5), (1300, 0.079, -10), (3000, 0.16, -21.5),
                  (6500, 0.15, -12.5), (13000, 0.08, -13)]
    t = np.arange(SR // 2) / SR
    echoes = np.zeros(len(t))
    for hz, t60, db in echo_bands:
        tail = band(rng.standard_normal(len(t)), hz / np.sqrt(2), hz * np.sqrt(2))
        tail *= from_db(-60 * t / t60) * (t > first_s)
        echoes += from_db(db) * tail / np.sqrt(np.sum(tail ** 2) * SR / hz)
    return signal.fftconvolve(x, echoes)[:N]


def arm_rumble():
    """Low rumble that follows the moving arms: noise below 60 Hz under a level curve."""
    # t/s, level/dB
    rumble_levels = [(0, -50.5), (5.3, -57.5), (6.5, -67.5), (6.94, -54.5), (7.3, -86.5), (9.59, -70)]
    return from_db(in_time(rumble_levels)[0]) * rms_one(band(rng.standard_normal(N), 12.0, 60.0))


def cooler_hum():
    """Wavering hum of cooler motors: noise through narrow resonators."""
    # f/Hz, width/Hz, level/dB
    hum_tones = [(106, 4.7, -65), (240, 24, -67.5), (299, 20, -61), (660, 14, -70.5)]
    out = np.zeros(N)
    for hz, width_hz, db in hum_tones:
        t60 = np.log(1000) / (np.pi * width_hz)
        out += from_db(db) * rms_one(ring(rng.standard_normal(N), hz, t60))
    return out


def air_noise(level_db=-57.5):
    """Steady air noise of the bar, strongest in the bass."""
    # f/Hz, relative level/dB per Hz
    air_colour = [(18, -29), (30, -6.5), (76, -14), (118, -4.5), (185, -22.5), (298, -12.5), (323, -18),
                  (368, -12), (432, -11), (694, -19), (1420, -27), (5890, -42.5), (16500, -46.5)]
    return from_db(level_db) * rms_one(colour(rng.standard_normal(N), air_colour))


def scene():
    """Ice, clinks, knock and snaps with their echoes; squeaks and background without."""
    ice = cubes()
    near = blows(ice) + chips(ice) + clinks() + jangle() + counter_knock() + bright_snaps()
    background = arm_rumble() + cooler_hum() + air_noise()
    return (near + bar_room(near) + squeaks() + background)[None]


def record(dry):
    """The loudest peaks at the microphone are rounded, and the treble is cut steeply."""
    rounded = .75 * np.tanh(dry / .75)
    top_cut = signal.cheby2(14, 90, 16900, fs=SR, output="sos")     # 90 dB down from 16.9 kHz up
    return signal.sosfilt(top_cut, rounded)


dry = scene()
out = record(dry)
to_wav(out)
```